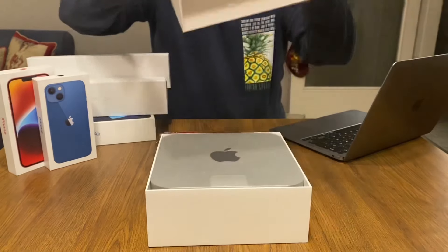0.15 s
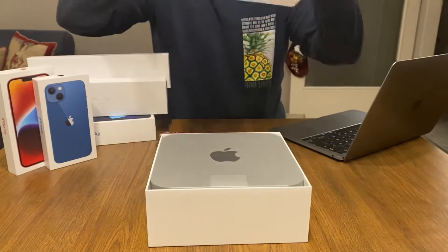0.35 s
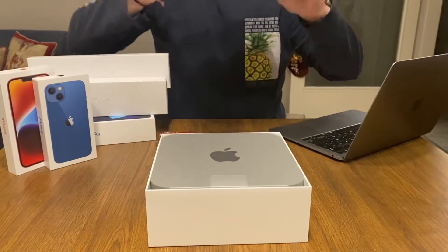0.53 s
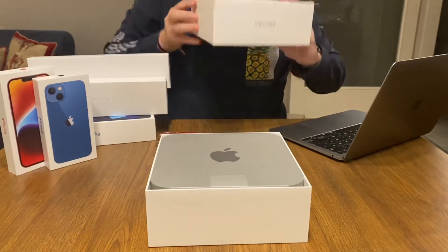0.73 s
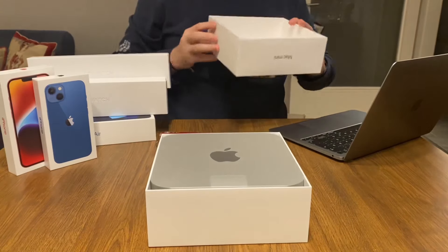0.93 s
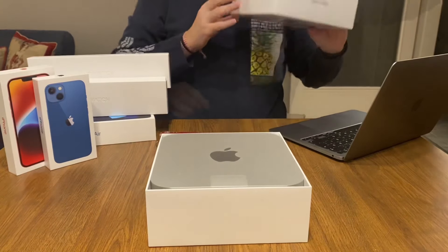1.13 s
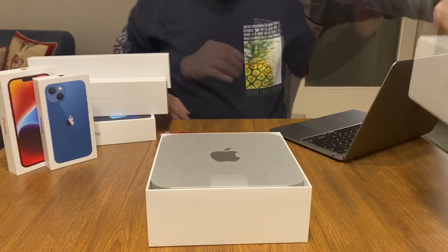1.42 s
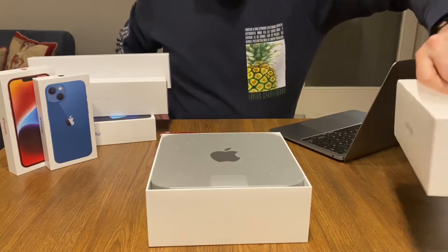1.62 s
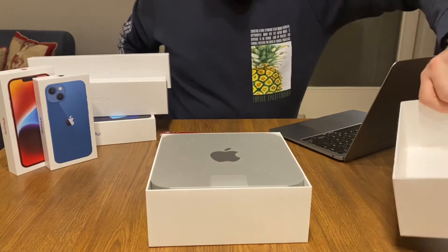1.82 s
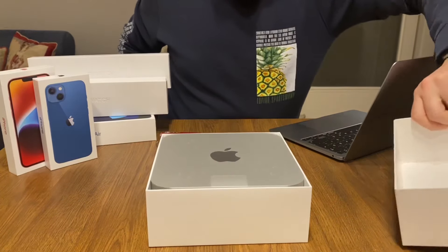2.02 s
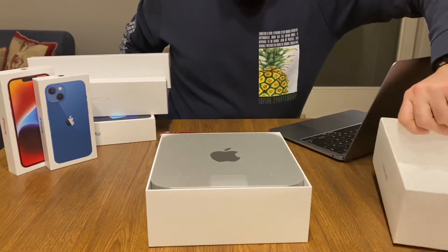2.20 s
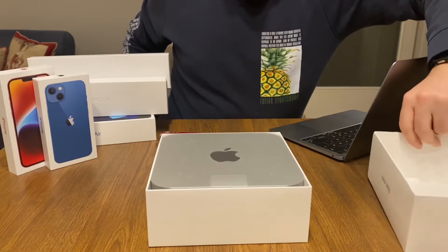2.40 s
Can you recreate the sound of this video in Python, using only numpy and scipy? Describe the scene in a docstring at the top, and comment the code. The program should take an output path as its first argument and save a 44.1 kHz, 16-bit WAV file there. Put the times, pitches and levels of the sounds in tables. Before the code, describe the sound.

A cardboard box lid is handled with faint swishes, light taps and dull bumps, then slaps onto a wooden table with a loud clack and quick bounces, in a small quiet room, close stereo microphone.

```python
"""In a small quiet room, a cardboard lid is turned in the hands, carried aside and dropped on a wooden table.
A faint, mostly low noise floor lies behind it; cloth, skin and card slide as slowly varying coloured noise.
Finger taps ring the modes of the lid, soft arm bumps those of the table top.
The lid's edges knock, slap down and bounce: table modes, treble arriving first, plus short cracks of noise.
Each blow has its own diffuse room tail, up to half a second long; two spaced microphone ports pick it all up."""
import sys
import numpy as np
from scipy import signal
from scipy.fft import rfft, irfft, next_fast_len
from scipy.io import wavfile
from scipy.ndimage import map_coordinates

SR = 44100
rng = np.random.default_rng(int(sys.argv[2]) if len(sys.argv) > 2 else 0)


def store_wav(level_fs):
    """Save 16-bit WAV to argv[1]."""
    pcm = np.round(np.clip(np.atleast_2d(level_fs), -1, 1) * 32767)
    wavfile.write(sys.argv[1], SR, pcm.T.astype(np.int16))


N = 112454  # length in samples

# Noise floor of the quiet room. Each row: frequency in Hz, relative level in dB.
FLOOR_SPECTRUM = [(20, -0.5), (50, 2.5), (105, -2.5), (206, -7.5), (300, -10.5), (720, -33), (1080, -28),
                  (2280, -35), (5000, -54.5), (9000, -40.5), (16500, -50)]
# Likeness of the sides in diffuse sound. Each row: frequency in Hz, left-right correlation from 0 to 1.
LIKENESS = [(60, 0.93), (200, 0.81), (500, 0.25), (1500, 0.096), (4000, 0.75), (6000, 0.32)]
# Room tail. Each row: frequency in Hz, 60 dB decay time in seconds, relative level in dB.
ROOM_TAIL = [(97, 0.6, -2), (199, 0.51, -1), (311, 0.22, 4), (520, 0.36, 0), (1060, 0.41, -3),
             (1950, 0.4, 0.5), (2500, 0.34, 2), (5100, 0.47, -6.5), (10000, 0.64, -6.5)]
# Sliding of the lid in the hands. Each row: time in seconds, level in dB of the swish of sleeve and finger,
# of the card scrape, and of the low rub in the lid's panels; the levels glide from row to row.
SLIDE_LEVELS = [(0.0, -88, -103, -68), (0.01, -73, -96, -86), (0.077, -72, -67, -107),
                (0.142, -78.5, -87, -81), (0.185, -59, -88, -65), (0.221, -72.5, -62.5, -94),
                (0.244, -63.5, -99, -86), (0.328, -58, -77, -74), (0.356, -71, -67, -65),
                (0.371, -61, -61, -73), (0.382, -71.5, -68.5, -71), (0.446, -73, -77.5, -70),
                (0.489, -70.5, -71, -82), (0.524, -65.5, -61.5, -74), (0.558, -63, -56.5, -68),
                (0.62, -64, -58.5, -67), (0.688, -68.5, -61.5, -66.5), (0.76, -73, -72.5, -80),
                (0.873, -71, -69, -72.5), (0.962, -81.5, -76.5, -73), (1.016, -69.5, -74.5, -69.5),
                (1.1, -81, -68, -63.5), (1.138, -72, -63, -62), (1.185, -78, -66.5, -58),
                (1.197, -71, -65, -52.5), (1.226, -69, -68, -55), (1.24, -69.5, -68.5, -58),
                (1.276, -61.5, -66, -67.5), (1.543, -81, -73, -71), (1.584, -75.5, -69, -67),
                (1.65, -97, -72.5, -70.5), (1.728, -97, -71, -71), (1.77, -99, -75.5, -63),
                (1.888, -100, -77, -72), (1.92, -76, -68, -88), (2.0, -82, -83, -90),
                (2.4, -67, -70.5, -80), (2.5, -87, -65, -59), (2.55, -78, -62.5, -75)]
# Swish of cloth and skin. Each row: frequency in Hz, relative level in dB.
SWISH_SPECTRUM = [(2000, -20), (3800, -10), (4800, -5.5), (5800, -5.5), (7500, -2), (9500, -4.5),
                  (11000, -2.5), (13000, -7.5), (16500, -13)]
# Scrape of card. Each row: frequency in Hz, relative level in dB.
SCRAPE_SPECTRUM = [(400, -19), (600, -5.5), (820, 9), (1400, 3), (2050, 1), (3500, -3), (4850, -3),
                   (6500, -8), (9000, -18), (16500, -44)]
# Low rub in the lid's panels. Each row: frequency in Hz, relative level in dB.
PANEL_SPECTRUM = [(200, -21), (330, -6.5), (440, -2.5), (520, -5.5), (600, 2.5), (650, -1), (710, -3),
                  (850, -9), (1200, -36)]
# Finger taps on the lid. Each row: start in seconds, relative level in dB, contact hardness in Hz.
FINGER_TAPS = [(0.063, -52.5, 1223), (0.103, -51.5, 1160), (0.161, -46.5, 1800), (0.218, -56.5, 2200),
               (0.226, -46, 1080), (0.307, -51.5, 1170), (0.325, -50, 1200), (0.369, -50, 1900),
               (0.376, -48.5, 1500)]
# Modes of the lid. Each row: nominal frequency in Hz, relative level in dB, 60 dB decay time in seconds.
LID_MODES = [(294, 5.5, 0.037), (432, 5.5, 0.044), (615, -9.5, 0.076), (1127, 1.5, 0.021),
             (1540, -17, 0.042), (1800, -8.5, 0.045), (2320, -5.5, 0.012)]
# Soft arm bumps on the table. Each row: time in seconds, relative level in dB, contact softness in Hz.
ARM_BUMPS = [(0.104, -42.5, 140), (0.166, -43, 141), (0.223, -35, 65), (0.323, -34, 80.4),
             (0.374, -31.5, 79), (0.759, -40, 119), (0.784, -38.5, 126), (1.106, -28.5, 140),
             (1.175, -28, 130), (1.207, -32, 140), (1.242, -20.5, 86), (1.277, -36, 119), (1.326, -42, 100),
             (1.39, -45, 120), (1.571, -56, 142)]
# Table top with the lid on it. Each row: nominal frequency in Hz, relative level in dB,
# 60 dB decay time in seconds when neither an arm nor scattering shortens it.
TABLE_MODES = [(58, -31.5, 0.55), (87.2, -15, 0.24), (118.36, -7.5, 0.53), (147.8, -5.5, 0.16),
               (182.4, -7, 0.088), (243.4, -1, 0.1), (296.7, 2.5, 0.028), (350, 2, 0.043),
               (450.3, -0.5, 0.08), (574.3, 2.5, 0.06), (637, 2.5, 0.032), (754, 3, 0.052), (823, 1, 0.027),
               (927, 4, 0.042), (1168, 1.5, 0.035), (1305, 5.5, 0.019), (1452, 6, 0.014),
               (1707, -8.5, 0.045), (1920, -9.5, 0.023), (2235, -14.5, 0.026)]
# Lid edges on the table. Each row: start in seconds, relative thud level in dB, contact hardness in Hz,
# boom of the low modes in dB, hollow of the lid in dB, relative crack level in dB,
# crack tilt in dB per octave, left over right in dB before the pickup.
LID_KNOCKS = [(1.602, -49.5, 855, 9, 0, -54, -6, 7), (1.737, -36.5, 820, 4, 0, -44.5, -7, 4.5),
              (1.898, -67.5, 700, 5, 7, -57, -2, 11), (1.932, -24.5, 600, 11, 5, -39, -5, 8.5),
              (2.153, -23, 517, 12.5, 5.5, -38, -5.5, 6.5), (2.1934, -4.5, 1960, -20, 1, -10, 1, 1.5),
              (2.1963, -12, 1870, 2.5, 1, -20.5, -1, 9), (2.207, -18.5, 930, 2, -3, -35.5, 6.5, 5),
              (2.227, -20.5, 1300, 6.5, -9, -36, 2, 4.5), (2.2976, -13, 1020, 3.5, 6.5, -23, 3, 5.5),
              (2.3069, -16.5, 730, 1, 0.5, -36.5, 3.5, -3), (2.421, -30.5, 524, -8, -8, -35, 18.5, 0.5)]
# Crack of a card edge slapping. Each row: frequency in Hz, relative level in dB before the tilt.
CRACK_SPECTRUM = [(500, -39), (1000, -25), (1560, -3), (3080, -8.5), (6000, -14.5), (7400, -20),
                  (10300, -19.5), (15700, -44.5)]
# Direct knock at the two sides, before the pickup. Each row: frequency in Hz,
# left over right in dB (added to the knock's own), radians by which the right leads.
KNOCK_SIDES = [(174, -6, 0.03), (540, -8.5, -0.6), (963, -13, 2.25), (1910, -5.5, 0.44), (2820, 7.5, 4),
               (4860, -6, -0.7), (5600, 9.5, 0.5)]
# Modes of the air and walls of the lid: lower and upper limit in Hz.
HOLLOW_BAND = (410, 630)
# Phase between the spaced ports. Each row: frequency in Hz, radians by which the right leads.
PORT_LEAD = [(150, -0.19), (350, 0.79), (600, 0.94), (1400, -0.071), (2000, -0.16), (3000, -0.97),
             (5000, -0.57), (6500, -1.1)]
# Level between the spaced ports. Each row: frequency in Hz, left over right in dB.
PORT_BALANCE = [(60, 1), (500, 3.5), (2000, 1.5), (5000, 5.5), (6500, 0)]

FLOOR_DB = -58  # rms before the microphone ports
ROOM_DB, ROOM_LATE_S = -1.5, 0.0067  # tail gain, delay behind the direct sound
SLIDE_GRAIN_DB, RUB_GRAIN_DB = 1, 3  # unevenness of the friction
BOOM_HZ = 200  # modes below this make the boom
DETUNE = 0.02  # largest relative shift of the modes above BOOM_HZ with the place of each blow
TAP_DB, BUMP_DB = -4.5, 5.5  # gains of taps and bumps
BUMP_DAMP = 0.32  # share of the ring time left by the arm
BUMP_ROOM_DB = -5.5  # room send: bumps travel mostly through the table top
THUD_DIRECT_DB, THUD_ROOM_DB = -8.5, -8.0  # gains of the thud heard directly and sent to the room
BEND_S = 0.0034  # lateness of the bending wave at 100 Hz, falling with pitch
CRACK_T60_S, CRACK_RISE_S = 0.011, 0.001  # decay by 60 dB, time constant of the rise
SCATTER, SCATTER_DB = 0.42, 6  # the room blurs the higher modes: share of their ring time, gain
PORT_TOP_HZ = 6500  # above this the treble comes from one port
TURN_FROM_HZ, TURN_HZ = 6900, 4400  # treble phase between the sides: zero here, one turn per TURN_HZ
CEILING = 0.93  # the input stage rounds off peaks here
TOP_HZ = 16400  # upper band limit


def amp(db):
    """Amplitude factor of a level in dB."""
    return 10 ** (np.asarray(db) / 20)


def unit(x):
    """Signal scaled to an rms of 1."""
    return x / np.sqrt(np.mean(x ** 2) + 1e-20)


def along(points, hz, axis=1):
    """One column of a table whose rows start with Hz, read on a log frequency axis."""
    table = np.transpose(points)
    return np.interp(np.log(hz + 1), np.log(table[0] + 1), table[axis])


def filtered(x, response):
    """Signal shaped by a complex response of frequency, with padding for its tail."""
    n = x.shape[-1]
    size = next_fast_len(n + SR // 4)
    spectrum = rfft(x, size) * response(np.fft.rfftfreq(size, 1 / SR))
    return irfft(spectrum, size)[..., :n]


def diffuse(pair):
    """Two unrelated signals mixed as mid and side until the sides are as alike as in the diffuse field."""
    def mid_and_side(hz):
        turn = np.arccos(np.clip(along(LIKENESS, hz), -1, 1)) / 2
        return np.array([np.cos(turn), np.sin(turn)])

    mid, side = filtered(pair, mid_and_side)
    return np.array([mid + side, mid - side])


def rush(spectrum, grain_db, rate):
    """Coloured diffuse noise of rms 1; its level flickers smoothly through rate random points a second."""
    points = rng.standard_normal(int(N * rate / SR) + 4)
    flicker = map_coordinates(points, [np.arange(N) * rate / SR])
    noise = rng.standard_normal((2, N)) * amp(grain_db * flicker)
    closed = [(0.6, -120)] + list(spectrum)  # no rumble toward 0 Hz
    return unit(diffuse(filtered(noise, lambda hz: amp(along(closed, hz)))))


def room_floor():
    """Steady, mostly low noise with a slow, slight flicker."""
    return amp(FLOOR_DB) * rush(FLOOR_SPECTRUM, 0.86, rate=6.28)


def room_tail():
    """Diffuse noise whose decay time and level depend on frequency, delayed behind the direct sound."""
    hz, t, cells = signal.stft(rng.standard_normal((2, SR // 2)), SR, nperseg=256)
    decay = amp(-60 * t / along(ROOM_TAIL, hz)[:, None])
    tail = diffuse(signal.istft(cells * decay, SR, nperseg=256)[1])
    tail = tail / np.linalg.norm(tail[0])
    tail = filtered(tail, lambda f: amp(ROOM_DB + along(ROOM_TAIL, f, axis=2)))
    return np.pad(tail, ((0, 0), (round(ROOM_LATE_S * SR), 0)))


def with_room(send, direct):
    """The direct blow plus its send convolved with a fresh room tail."""
    return direct + signal.fftconvolve(send[None], room_tail(), axes=1)[:, :len(send)]


def add(track, s, sound):
    """Mix a sound into the track at a time in seconds."""
    at = round(s * SR)
    track[:, at:at + sound.shape[-1]] += sound


def ring(modes, contact_hz, bend_s=0, boom_db=0, hollow_db=0, order=4):
    """One blow on decaying modes: hard contact reaches higher, bending waves bring the low modes later."""
    hz, db, t60 = np.transpose(modes)[:, :, None]
    hz = hz * (1 + DETUNE * (hz > BOOM_HZ) * rng.uniform(-1, 1, hz.shape))
    t = np.clip(np.arange(SR // 2) / SR - bend_s * 100 / hz, 0, None)
    spread_db = np.clip(rng.standard_normal(hz.shape), -2, 2) * 1.5
    in_hollow = (hz > HOLLOW_BAND[0]) * (hz < HOLLOW_BAND[1])
    place_db = boom_db * (hz < BOOM_HZ) + hollow_db * in_hollow
    contact = 1 / np.sqrt(1 + (hz / contact_hz) ** (2 * order))
    size = amp(db + spread_db + place_db - 60 * t / t60) * contact
    sign = (-1) ** np.arange(len(hz))[:, None]  # neighbouring modes opposed
    rise = 1 - np.exp(-2 * t * hz)
    return (sign * size * rise * np.sin(2 * np.pi * hz * t)).sum(0)


def sliding():
    """Friction noise: cloth and skin swish high, card scrapes broad, the panels hum low."""
    s, *levels_db = np.transpose(SLIDE_LEVELS)
    swish, scrape, rub = [amp(np.interp(np.arange(N) / SR, s, db)) for db in levels_db]
    out = swish * rush(SWISH_SPECTRUM, SLIDE_GRAIN_DB, rate=68)
    out += scrape * rush(SCRAPE_SPECTRUM, SLIDE_GRAIN_DB, rate=140)
    out += rub * rush(list(PANEL_SPECTRUM) + [(3000, -120)], RUB_GRAIN_DB, rate=49)
    return out


def arm_bumps():
    """Soft arms excite the low modes of the table top and damp their ring."""
    out = np.zeros((2, N + SR))
    damped = np.multiply(TABLE_MODES, [1, 1, BUMP_DAMP])
    for s, db, soft_hz in ARM_BUMPS:
        bump = amp(db + BUMP_DB) * ring(damped, soft_hz, order=3)
        add(out, s - 0.006, with_room(amp(BUMP_ROOM_DB) * bump, bump))  # onset 6 ms ahead of the listed time
    return out[:, :N]


def finger_taps():
    """Fingertips ring the modes of the cardboard lid."""
    out = np.zeros((2, N + SR))
    for s, db, hard_hz in FINGER_TAPS:
        tap = amp(db + TAP_DB) * ring(LID_MODES, hard_hz, order=1)
        add(out, s, with_room(tap, tap))
    return out[:, :N]


def edge_crack(tilt_db):
    """Card edge slapping: a short burst of coloured noise, tilted about 4 kHz."""
    t = np.arange(SR // 2) / SR
    colour = lambda hz: amp(along(CRACK_SPECTRUM, hz) + tilt_db * np.log2((hz + 1) / 4000))
    noise = unit(filtered(rng.standard_normal(len(t)), colour))
    return noise * amp(-60 * t / CRACK_T60_S) * (1 - np.exp(-t / CRACK_RISE_S))


def at_both_sides(blow, pan_db):
    """A direct knock with a level and phase difference between the sides at each frequency."""
    sign = np.array([[-0.5], [0.5]])
    level = lambda hz: amp(-sign * (pan_db + along(KNOCK_SIDES, hz)))
    phase = lambda hz: np.exp(1j * sign * along(KNOCK_SIDES, hz, axis=2))
    return filtered(blow, lambda hz: level(hz) * phase(hz))


def lid_knocks():
    """Lid edges hit the table: modes of the top thud, the card cracks, the room scatters the higher modes."""
    out = np.zeros((2, N + SR))
    lead_in = (SR // 100, 0)  # 10 ms of room for phase that runs ahead
    blurred = [(hz, db + SCATTER_DB * (hz > BOOM_HZ), t60 * (SCATTER if hz > BOOM_HZ else 1))
               for hz, db, t60 in TABLE_MODES]
    for s, thud_db, hard_hz, boom_db, hollow_db, crack_db, tilt_db, pan_db in LID_KNOCKS:
        crack = amp(crack_db) * edge_crack(tilt_db)
        thud = ring(TABLE_MODES, hard_hz, BEND_S, boom_db, hollow_db, order=2)
        far_thud = ring(blurred, hard_hz, BEND_S, boom_db, hollow_db / 2, order=2)
        near = np.pad(amp(thud_db + THUD_DIRECT_DB) * thud + crack, lead_in)
        far = np.pad(amp(thud_db + THUD_ROOM_DB) * far_thud + crack, lead_in)
        add(out, s - 1 / 100, with_room(far, at_both_sides(near, pan_db)))
    return out[:, :N]


def scene():
    """Floor, sliding, bumps, taps and knocks together."""
    return room_floor() + sliding() + arm_bumps() + finger_taps() + lid_knocks()


def record(dry):
    """Spaced ports pick up the lower band, one port the treble; then a soft ceiling and a band limit."""
    sign = np.array([[-1], [1]])
    below = lambda hz, edge_hz, width_hz: np.clip(0.5 - (hz - edge_hz) / width_hz, 0, 1)
    balance = lambda hz: amp(-sign * along(PORT_BALANCE, hz) / 2)
    lead = lambda hz: np.exp(0.5j * sign * along(PORT_LEAD, hz))
    turn = lambda hz: np.exp(1j * np.pi * sign * (hz - TURN_FROM_HZ) / TURN_HZ)
    low = filtered(dry, lambda hz: below(hz, PORT_TOP_HZ, 600) * balance(hz) * lead(hz))
    high = filtered(dry[:1], lambda hz: (1 - below(hz, PORT_TOP_HZ, 600)) * turn(hz))  # left side only
    both = low + high
    rounded = both / (1 + np.abs(both / CEILING) ** 6) ** (1 / 6)
    return filtered(rounded, lambda hz: below(hz, TOP_HZ, 400))


dry = scene()
out = record(dry)
store_wav(out)
```